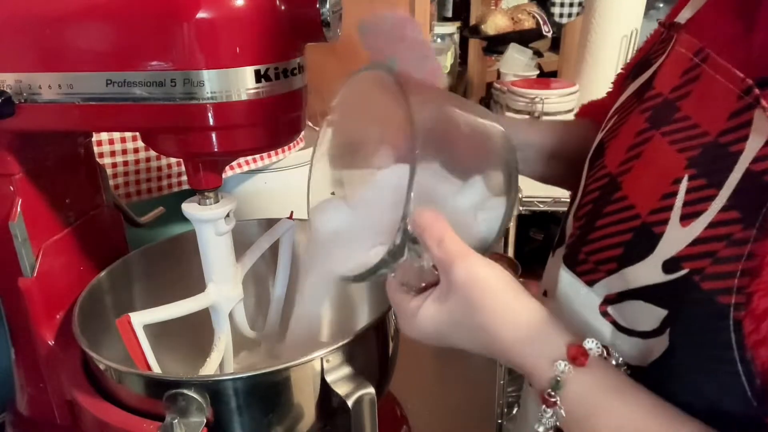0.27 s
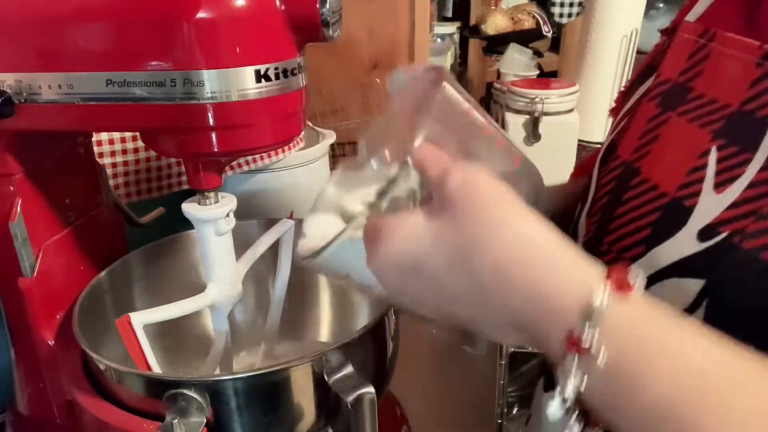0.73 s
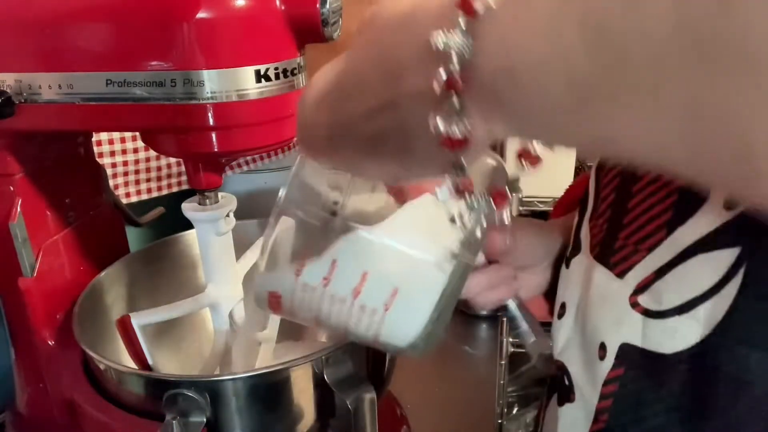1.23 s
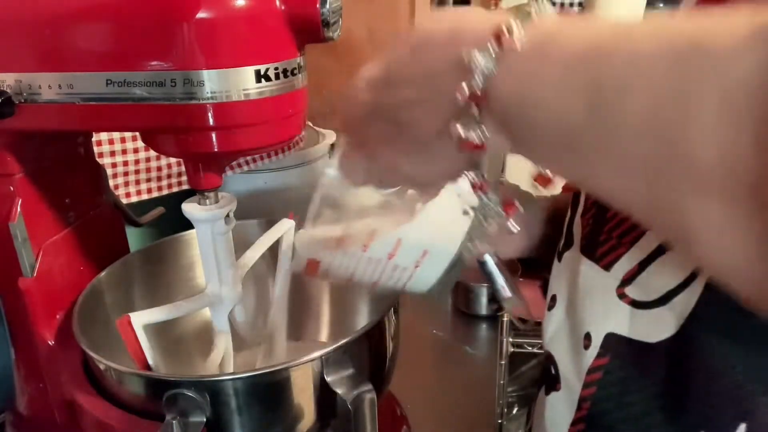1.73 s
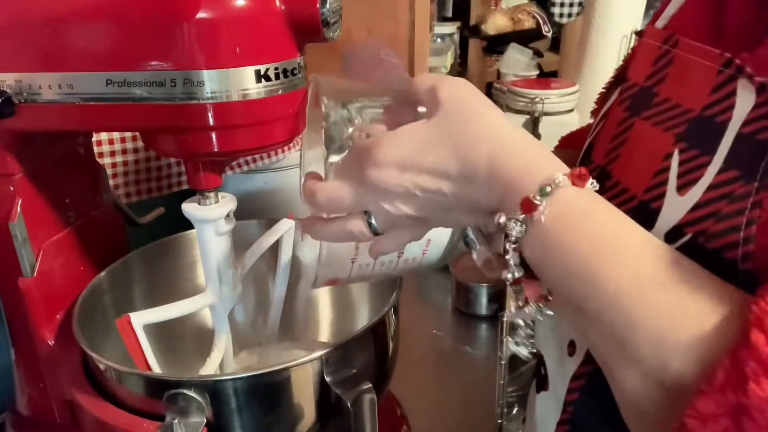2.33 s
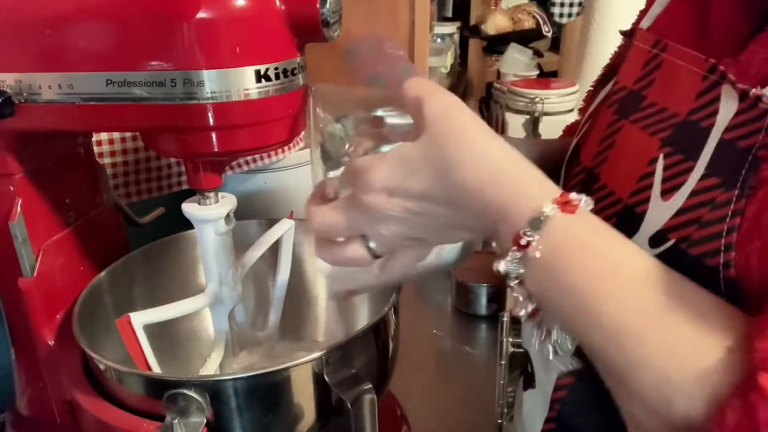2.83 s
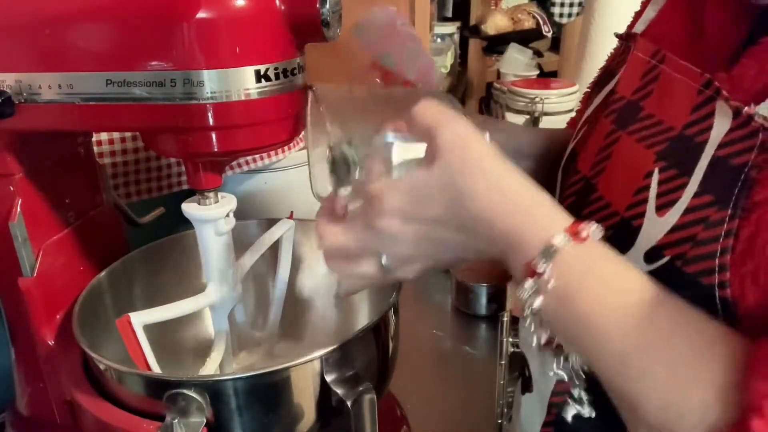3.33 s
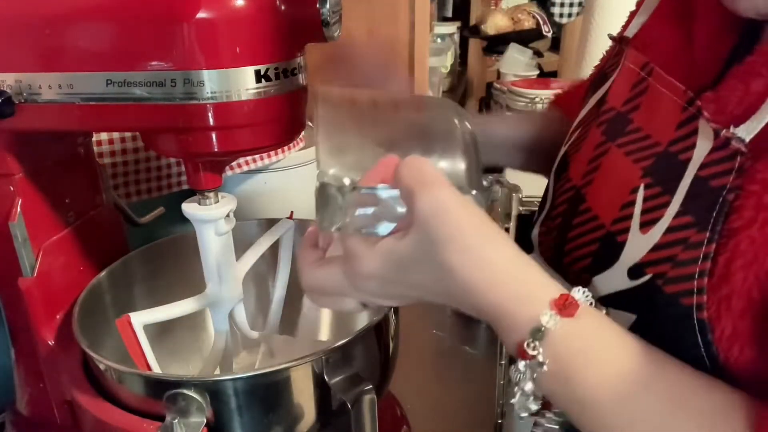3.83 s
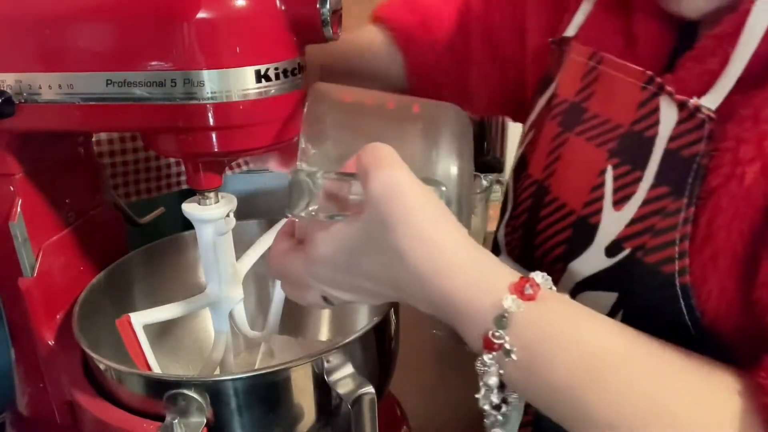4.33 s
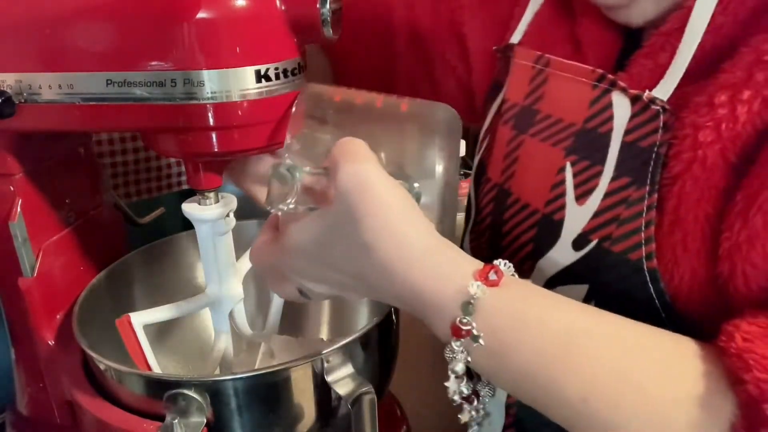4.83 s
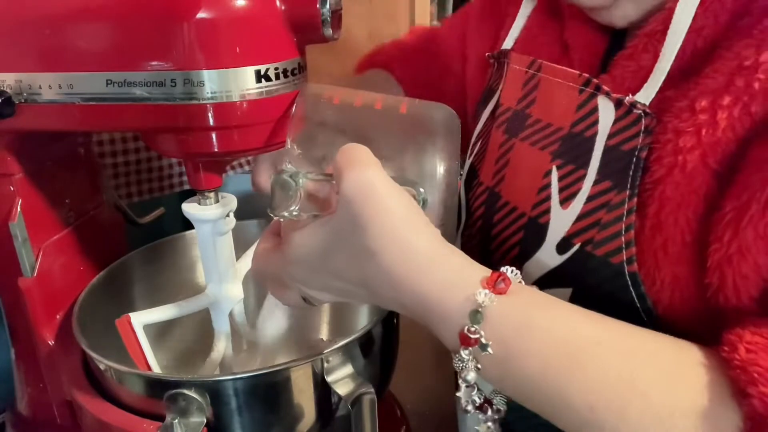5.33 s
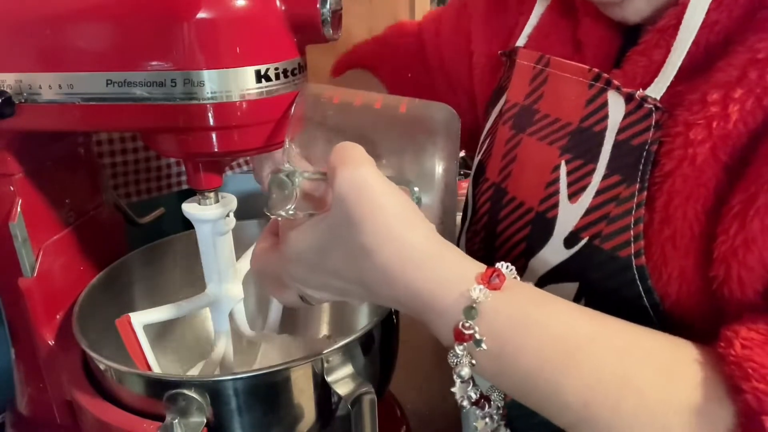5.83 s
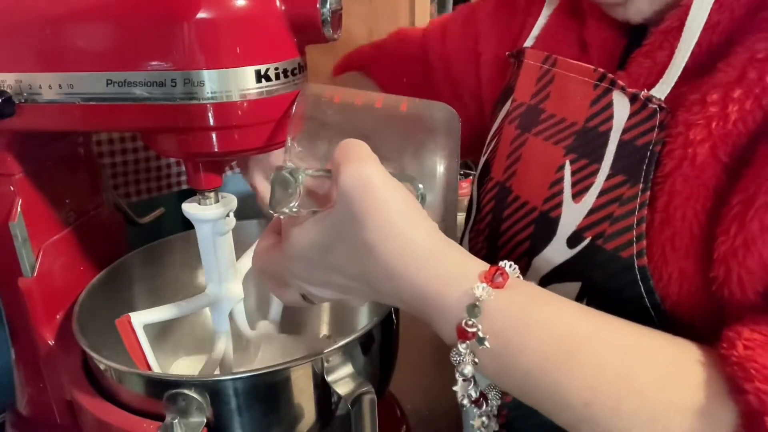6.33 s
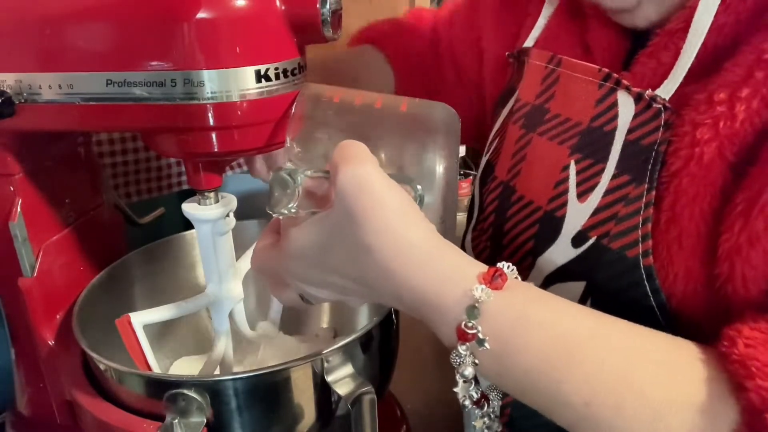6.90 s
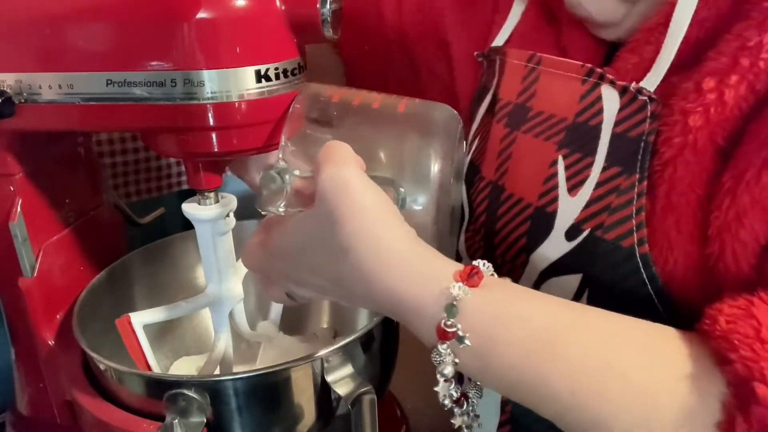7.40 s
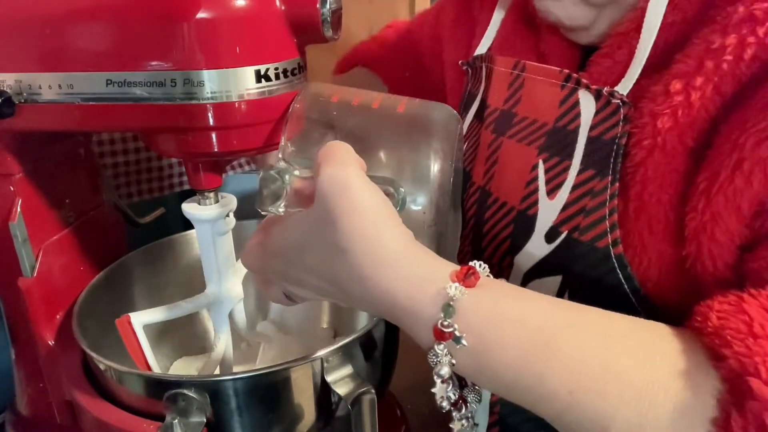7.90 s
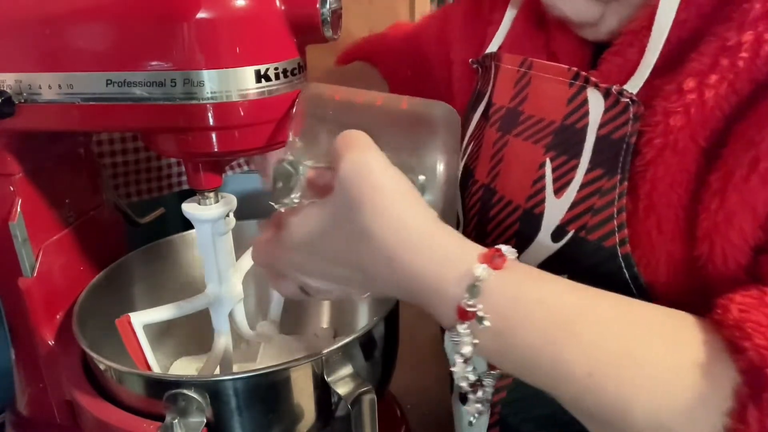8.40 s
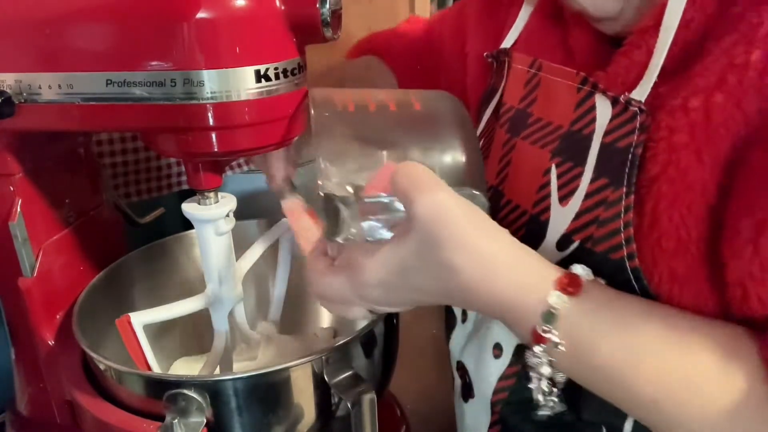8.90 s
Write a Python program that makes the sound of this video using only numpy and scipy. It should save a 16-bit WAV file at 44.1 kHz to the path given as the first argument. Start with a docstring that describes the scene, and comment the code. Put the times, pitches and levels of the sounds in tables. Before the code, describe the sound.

Glass measuring cup knocks, clinks and scrapes on a steel mixing bowl while sugar hisses out in a stream and later bursts, in a quiet kitchen.

```python
"""In a quiet kitchen, sugar is poured from a glass measuring cup into the steel bowl of a stand mixer.
Showers of random grain clicks, coloured by glass, sugar and steel, make the hissing spills and the stream.
The cup knocks, rubs and scrapes on the rim: bursts of tiny impacts set the ringing peaks of bowl and glass going.
Bracelet charms and crumbs tick, and the mixer bumps dully on the counter in narrow bands of low noise.
Echoes follow the contacts, over a low room murmur; two microphone ports hear it all in stereo."""
import sys
import numpy as np
from scipy import signal
from scipy.fft import rfft, irfft, next_fast_len
from scipy.io import wavfile
from scipy.ndimage import uniform_filter1d, map_coordinates

SR = 44100
rng = np.random.default_rng(int(sys.argv[2]) if len(sys.argv) > 2 else 0)


def pcm_store(signal):
    """Save signal as 16-bit PCM."""
    levels = np.round(np.clip(np.atleast_2d(signal), -1, 1) * 32767)
    wavfile.write(sys.argv[1], SR, levels.astype(np.int16).T)


N = 403515   # length of the scene [samples]
RING_SIZE = 16384   # length of one contact sound [samples]
RUB_SPOT_DB = 6   # how strongly each rub or scrape favours resonances of its own [dB]

# main stream falling freely on to the steel: (time [s], flow level [dB])
STREAM = [(1.43, -76), (1.49, -54), (1.56, -55.5), (1.72, -55.5), (1.86, -60.5), (2.0, -65), (2.21, -74.5),
          (2.33, -90)]
# tone of its fine spray: (frequency [Hz], relative level [dB])
SPRAY = [(2000, -22), (5500, -11), (8000, 4.5), (9800, 5.5), (12500, 2.5), (16000, 1.5)]
# tone of the heavier patter: (frequency [Hz], relative level [dB])
PATTER = [(500, -14.5), (1500, 4.5), (3000, -1.5), (5000, 3), (7500, -10), (11000, -15)]


def stream(crystals_per_s=16000, patter_db=-59, patter_follows=1.57, size=65536):
    """A dense stream of crystals sprays on the steel; as it thins, the patter dies before the fine hiss."""
    out, start = np.zeros((2, N)), STREAM[0][0]
    flow, = rest_outside(STREAM, start + seconds_of(size))
    crystals = np.array([grains(size, per_s=crystals_per_s, spread_db=4.5) for _ in range(4)])
    spray = flow * diffuse(crystals[:2], body(SPRAY, [], size), (8000, 15000))
    # patter_db holds at full flow; patter_follows is how much faster than the spray it dies
    patter_gain = from_db(patter_db) * (flow / flow.max()) ** patter_follows
    patter = patter_gain * diffuse(crystals[2:], body(PATTER, [], size), (2700, 7000))
    add_pair(out, start, spray + patter)
    return out


# spills of sliding sugar: (start [s], swell [s], hold [s], fade [s], relative hiss level [dB],
# relative level of the rush inside the cup [dB], glide of the rush [octaves/s])
SPILLS = [(0.351, 0.038, 0.75, 0.2, -82, -74, 0), (1.157, 0.09, 0.056, 0.25, -61.5, -69.5, 0.12),
          (2.91, 0.028, 0.69, 0.14, -67.5, -64.5, -0.098), (4.024, 0.04, 0.023, 0.36, -66, -70, 0.023),
          (4.583, 0.043, 0.013, 0.074, -72.5, -67, -.8), (4.92, 0.38, 0.083, 0.26, -58, -64, -0.1),
          (5.428, .04, 0.047, 0.17, -50.5, -60, -0.12), (5.702, 0.35, 0.038, 0.15, -51.5, -59, 0.14),
          (6.186, 0.055, 0.025, 0.058, -64.5, -74, -0.024), (6.31, 0.15, 0.098, 0.21, -56.5, -60.5, 0.16),
          (7.257, 0.038, 0.018, 0.072, -71.5, -74.5, 0), (7.458, 0.16, 0.16, 0.14, -62.5, -69, 0.23),
          (7.92, .025, 0.011, 0.043, -71.5, -86.5, -0.065), (8.161, 0.11, 0.11, 0.091, -60, -64.5, 0.51)]
# tone of grains on glass: (frequency [Hz], relative level [dB])
HISS = [(1000, -34), (3500, -18), (5500, -18.5), (7500, 2), (9500, -3.5), (12000, 2.5), (14500, -7),
        (16000, -19)]
# resonances of the sliding sugar: (frequency [Hz], width [Hz], lift [dB])
SUGAR_MODES = [(6013, 160, 3.7), (7000, 100, 7), (8070, 120, 6), (8550, 120, 5), (9380, 110, 14),
               (9720, 60, 4), (10130, 100, 6.3), (12300, 150, 3), (12900, 200, 4)]
# tone of the rush in the hollow cup: (frequency [Hz], relative level [dB])
RUSH = [(200, -14.5), (700, -0.5), (1200, 3), (2200, 4), (4200, 1.5), (6000, -1), (10000, -20.5)]
# resonances of the hollow cup: (frequency [Hz], width [Hz], lift or dip [dB])
CUP_MODES = [(790, 60, 9.5), (1250, 250, -2.5), (1630, 110, 1.5), (2110, 54, 11), (2581, 160, 4),
             (3470, 126, 1.5), (3930, 73, 8), (4300, 300, -3.5), (4650, 150, 1.5), (5700, 300, -8)]


def sugar(edge_s=0.038, hiss_db=-4.5, rush_db=0.5, coarse_db=-6, coarse_per_s=90, hollow_db=6.5,
          hollow_spacing_hz=130, clump_db=1.5, clumps_per_s=45, surge_db=3.0, surges_per_s=16,
          swell_power=1.05, fade_drop_db=23, fade_power=0.78, rush_follows=0.86, size=65536):
    """Crystals hiss over the glass; the hollow cup rings with them, and its pitch glides as the cup tilts."""
    out, t = np.zeros((2, N)), seconds_of(size)
    glass, cup = body(HISS, SUGAR_MODES, size), body(RUSH, CUP_MODES, size)
    for s, swell, hold, fade, hiss, rush, glide in SPILLS:
        end = swell + hold + fade
        # the spill trickles out, losing level a little faster at first, then is cut by a short edge
        fade_db = -fade_drop_db * np.clip((t - swell - hold) / fade, 0, 1) ** fade_power
        rise = np.sin(np.pi / 2 * np.minimum(t / swell, 1)) ** swell_power
        edge = np.clip(1 - (t - end) / edge_s, 0, 1)
        flow = uneven(t, clump_db, clumps_per_s) * rise * edge   # sugar falls in clumps
        crystals = np.array([grains(size, per_s=5400, spread_db=1.5) for _ in range(2)])
        # a few crystals are coarse
        crystals = crystals + from_db(coarse_db) * grains(size, per_s=coarse_per_s, spread_db=3.0)
        hissing = shifting(crystals, glass, (3500, 10000), hollow_db, hollow_spacing_hz)
        hissing = from_db(hiss_db + hiss + fade_db) * hissing
        hollow = shifting(crystals[::-1], cup, (2500, 5500), hollow_db, hollow_spacing_hz)
        hollow = gliding(hollow, glide * (np.minimum(t, end) - swell))
        # the rush takes only part of the hiss's fade, so it dies more slowly
        rushing = from_db(rush_db + rush + rush_follows * fade_db) * hollow
        add_pair(out, s, flow * (hissing + rushing * uneven(t, surge_db, surges_per_s)))
    return out


# lumps of sugar that break loose and land: (time [s], length [s], level [dB])
LUMPS = [(5.445, 0.11, -51.5), (5.737, 0.036, -56), (6.061, 0.11, -51), (6.548, 0.021, -62.5),
         (6.623, 0.036, -53.5), (6.666, 0.019, -59.5)]
# tone of their soft patter on the heap: (frequency [Hz], relative level [dB])
LUMP_TONE = [(100, 11), (450, 4), (900, 8.5), (1500, 3), (2500, -14.5), (4500, -7), (6000, 1.5),
             (10000, -20.5), (15000, -21)]


def lumps():
    """A lump falls apart as it lands: a short, dense shower of crystals."""
    out, t, heap = np.zeros(N), seconds_of(RING_SIZE), body(LUMP_TONE, CUP_MODES, RING_SIZE)
    for s, length, db in LUMPS:
        shower = np.sqrt(arch(t, length)) * grains(RING_SIZE, per_s=4200, spread_db=3)
        add(out, s, voiced(rfft(shower) * heap, [(300, 11000)], [db], seconds=length))
    return out


# broad tone of cup and bowl together: (frequency [Hz], relative level [dB])
BOWL = [(30, -43.5), (80, -16), (170, -7.5), (350, -10), (600, -5.5), (950, 7.5), (1400, -7.5),
        (2200, -19.5), (2900, -27), (4200, -29.5), (5600, -24.5), (8000, -31), (10000, -31), (15000, -43.5)]
# resonances of cup and bowl: (frequency [Hz], width [Hz], lift or dip [dB])
BOWL_MODES = [(102, 8, 9.5), (322, 4.6, 8), (425.9, 21, 10), (516.5, 29, 10.5), (574, 6.7, -17.5),
              (658, 18, 8.5), (742, 15, 10), (770, 40, 4.5), (900.5, 60.4, 10.5), (1044, 50, 15),
              (1130, 33, 6.5), (1230, 40, 6), (1283, 92, -9.5), (1356, 140, 6), (1470, 260, 8),
              (1830, 13, 7), (2114, 62, 14), (2470, 37, -7.5), (2385, 21, 11.5), (2504, 12, 15.5),
              (2584, 15, 6), (2800, 45, 6), (3000, 70, 2.5), (3610, 20, 8.5), (3770, 34, 7.5),
              (4760, 45, 12), (5090, 80, 15), (5120, 300, 4), (6310, 360, 12), (6560, 110, 4),
              (6800, 60, 1.5), (8560, 200, 7), (14150, 210, 7.5)]


def cup_and_bowl():
    """Cup and bowl answer every blow with a broad tone and many ringing peaks."""
    return body(BOWL, BOWL_MODES, RING_SIZE)


# two close rings of the glass that trade strength: (frequency [Hz], width [Hz], sign)
GLASS_PAIR = [(4370, 120, 0.83), (5100, 120, -1)]


def glass_wall(trade_db=4):
    """The point of contact, drawn at random, favours one of the two close rings of the glass."""
    favour_db = trade_db * rng.uniform(-1, 1)
    return body([(1000, 0)], [(hz, width, sign * favour_db) for hz, width, sign in GLASS_PAIR], RING_SIZE)


# cup strikes bowl: (time [s], relative strength [dB], hardness [dB], clank of the glass [dB])
KNOCKS = [(.012, -39.5, -13, -2), (0.052, -43, -16, 2), (0.182, -53, -23, 0), (0.242, -38, -22, -9),
          (0.326, -50, -20.5, -4), (0.414, -43.5, -18, -3), (1.0331, -23, -4.5, -12.5),
          (1.127, -42.5, -44, 13), (2.358, -35.5, -21.5, -2), (2.712, -34, -8, 2), (2.733, -32, -8, 0),
          (2.788, -30, -7, -2), (2.8065, -29, -4.5, 6), (2.908, -43.5, -33, 3), (3.016, -35, -9.5, -7),
          (3.0842, -22, -4, 6.5), (3.157, -26, -6.5, -1.5), (3.316, -18.5, -4, 8.5), (3.4492, -25, -4, -5),
          (3.4649, -17, -2, -2), (3.572, -30.5, -6.5, 3.5), (3.676, -43.5, -7.5, 5.5), (4.754, -40, -11, 0),
          (4.8314, -18, -7.5, 0), (4.866, -30, -7, -4), (4.9642, -23.5, -10, -13), (4.9871, -31, -10, -12),
          (5.003, -39.5, -12, -6), (5.9088, -30.5, -15, -21), (5.931, -34, -12.5, -22),
          (5.95, -38.5, -26, -10), (7.262, -44.5, -21, 2.5), (7.3965, -29, -10, 4.5),
          (7.4244, -34, -11, 7.5), (7.44, -40, -9.5, 5), (7.452, -45.5, -8, -14), (7.464, -40.5, -21, -21),
          (8.076, -53.5, -18, 27), (8.532, -33, -9, 5), (8.668, -37, -8.5, 2), (8.685, -36.5, -6.5, 2),
          (8.733, -23, -6.5, -8), (8.763, -23.5, -6, 4.5), (8.784, -26, -5.5, -19), (8.799, -32, -5, -21),
          (9.041, -49, -21.5, 11.5), (9.11, -55, -8, 1.5)]
# frequency bands of a knock: (low edge [Hz], high edge [Hz])
KNOCK_BANDS = [(60, 300), (300, 700), (700, 1400), (1400, 2700), (3500, 10000)]
# a harder blow reaches higher; per knock band: (level against the strength [dB], slope [dB per dB of hardness])
KNOCK_COLOUR = [(-19, -0.29), (-3, 0), (1, 0.49), (4, 1.68), (-1.5, 2.5)]
# a square hit rings the glass wall, a flat one the belly of the bowl:
# (frequency [Hz], width [Hz], signed share of the clank [ratio])
CLANK = [(2155, 190, 1.2), (1008, 75.7, 0.4), (813, 190, -0.53)]


def knocks(bowl, bite_s=0.002, buzz_t60=0.025, click_db=5, rattle_t60=0.21, rattle_db=-24, rattle_hz=2400,
           rattle_spot_db=6, spot_db=3.2, even_hz=280, level_db=-0.45):
    """Glass bites into the steel and clanks briefly, then the bowl rattles dully in its mount."""
    out, t = np.zeros(N), seconds_of(RING_SIZE)
    bite = 1 - np.exp(-t / bite_s)
    for s, db, hardness_db, clank_db in KNOCKS:
        click = from_db(click_db) * (t == 0)
        buzz = bite * dying(t, buzz_t60) * grains(RING_SIZE, per_s=6500, spread_db=4)
        rattle = bite * from_db(rattle_db) * dying(t, rattle_t60)
        rattle = rattle * grains(RING_SIZE, per_s=7500, spread_db=5.5)
        clank = body([(1000, 0)], [(hz, width, share * clank_db) for hz, width, share in CLANK], RING_SIZE)
        # each spot on the rim has a colour of its own
        blow = evened(click + buzz, even_hz) * clank * fine_modes(RING_SIZE, spot_db, spacing_hz=95.45)
        rattle_colour = dulled(rattle_hz) * fine_modes(RING_SIZE, rattle_spot_db, spacing_hz=55)
        blow = blow + rfft(rattle) * rattle_colour
        levels_db = band_levels(KNOCK_COLOUR, db, hardness_db)
        add(out, s, voiced(blow * bowl * glass_wall(), KNOCK_BANDS, levels_db, seconds=0.018))
    return from_db(level_db) * out


# cup drags on the rim: (time [s], length [s], relative strength [dB], grittiness [dB])
RUBS = [(.005, 0.043, -41.5, 1.5), (0.024, 0.057, -43, 2), (.08, 0.054, -35, -1.5),
        (0.154, 0.036, -37, -1.5), (0.223, 0.036, -42.5, 2), (0.29, 0.058, -43, 2), (0.375, 0.067, -46, 5),
        (1.29, 0.1, -53, 0.5), (1.443, 0.043, -42, 2.5), (1.492, 0.038, -46, 2.5), (1.584, 0.026, -48, 2.5),
        (1.621, 0.063, -49.5, 5), (1.688, 0.11, -53.5, 5.5), (1.772, 0.038, -50.5, 7.5),
        (1.807, 0.042, -47.5, 3.5), (1.919, 0.056, -53.5, -2), (2.013, 0.018, -46, -26),
        (2.138, 0.028, -41.5, -4), (2.207, .04, -55.5, 0.5), (2.306, 0.12, -49.5, 0),
        (2.353, 0.047, -42, 2), (2.466, 0.057, -48, -7), (2.537, 0.052, -50.5, -1), (2.609, 0.29, -61, 5.5),
        (2.708, 0.025, -29.5, 3.5), (2.946, 0.06, -49.5, -3), (3.002, 0.012, -38.5, -6.5),
        (3.597, 0.16, -47, -2), (3.671, 0.043, -36, 0.5), (3.892, 0.18, -51.5, -4),
        (4.708, 0.044, -46.5, 4.5), (8.454, 0.105, -37.5, -1), (8.545, .11, -46, -1.5),
        (8.699, .035, -48, 3.5), (8.67, 0.02, -40.5, 3.5), (8.762, 0.052, -29, -3),
        (8.807, 0.061, -37.5, -0.5), (8.941, 0.052, -42.5, 3)]
# frequency bands of a rub: (low edge [Hz], high edge [Hz])
RUB_BANDS = [(300, 700), (700, 1400), (1400, 2700), (4500, 7500)]
# sugar under the glass brightens the rub; per rub band:
# (level against the strength [dB], slope [dB per dB of grittiness])
RUB_COLOUR = [(-1.5, 0), (-5, 0.55), (-17.5, 1.55), (-15.5, 1.86)]
# force of rubbing against that of a blow: (frequency [Hz], relative level [dB])
RUB_TILT = [(100, -8.5), (300, -9), (480, 4), (750, -4), (1020, -3.5), (3500, -4), (7000, -1), (10000, -9),
            (15000, -0.5)]


def rubs(bowl, slips_per_s=3000, swell=0.54, slide_s=0.06, sing_hz=4980, sing_width_hz=260, sing_db=7.5,
         catch_db=3, catches_per_s=110, trail_db=-6.5, trail_t60=0.12, trail_hz=3000, level_db=-2):
    """Dragging glass catches and slips on sugar grains, making the cup sing; it trails off light and dull."""
    out, t = np.zeros(N), seconds_of(RING_SIZE)
    rubbed = bowl * body(RUB_TILT, [(sing_hz, sing_width_hz, sing_db)], RING_SIZE)
    slide = np.pi / 2 * t / slide_s   # after slide_s the cup is at a spot of another colour
    for s, length, db, grit_db in RUBS:
        pressure = arch(t, length) ** swell * uneven(t, catch_db, catches_per_s)
        force = 0
        for weight in (np.cos(slide), np.sin(slide)):
            slips = evened(weight * pressure * grains(RING_SIZE, per_s=slips_per_s, spread_db=1.5))
            force = force + slips * fine_modes(RING_SIZE, RUB_SPOT_DB, spacing_hz=88.4)
        # a light drag joins halfway through and dies away after the rub
        trail = (t > length / 2) * from_db(trail_db) * dying(np.maximum(t - length, 0), trail_t60)
        trail = trail * grains(RING_SIZE, per_s=slips_per_s, spread_db=0.0)
        force = force + rfft(trail) * dulled(trail_hz)
        levels_db = band_levels(RUB_COLOUR, db, grit_db)
        add(out, s, voiced(force * rubbed * glass_wall(), RUB_BANDS, levels_db, seconds=length))
    return from_db(level_db) * out


# cup slides back along the rim: (time [s], level of the bowl's rasp [dB], level of the glass singing [dB])
SCRAPE = [(.42, -75, -76), (0.451, -51.5, -65), (.52, -54.5, -60.5), (.59, -52, -54.5), (.72, -51.5, -48.5),
          (.775, -51, -52), (.80, -62, -63), (.87, -67, -73)]
# tone of the rasp: (frequency [Hz], relative level [dB])
RASP = [(150, -22), (450, -2.5), (900, 1), (1500, -3), (2200, -3.5), (3000, -21), (6000, -55)]
# tone of the singing glass: (frequency [Hz], relative level [dB])
SING = [(2500, -18), (4300, -18.5), (5500, -11.5), (7000, -6.5), (8200, -8), (9500, -16), (16000, -28)]
# resonances of the singing glass: (frequency [Hz], width [Hz], lift [dB])
SING_MODES = [(4800, 150, 17.5), (5030, 110, 24.5), (6700, 200, 14), (7300, 200, 5), (10900, 400, 10)]


def scrape(catch_db=-1.0, catches_per_s=70, size=32768):
    """Sugared glass slips along the rim: the bowl rasps and the glass sings, swelling before it dies away."""
    out, start, t = np.zeros((2, N)), SCRAPE[0][0], seconds_of(size)
    voices = [(body(RASP, [], size), (600, 2600)), (body(SING, SING_MODES, size), (4500, 8000))]
    grip = uneven(t, catch_db, catches_per_s)
    for gain, (response, band) in zip(rest_outside(SCRAPE, start + t), voices):
        slips = np.array([grains(size, per_s=4000, spread_db=2.0) for _ in range(2)])
        add_pair(out, start, gain * grip * shifting(slips, response, band, RUB_SPOT_DB, spacing_hz=99.3))
    return out


# bracelet charms touch: (time [s], relative level [dB])
CHARMS = [(.3603, -51), (1.144, -68), (1.182, -65), (2.934, -56.5), (3.051, -61), (3.136, -53), (3.77, -56),
          (3.875, -42.5), (4.066, -46.5), (4.178, -58), (4.572, -57), (5.532, -47), (5.59, -46.5),
          (6.243, -60), (6.396, -52.5), (6.852, -49), (6.911, -63.5)]
# crumbs of sugar hit glass and steel: (time [s], relative level [dB])
CRUMBS = [(.5366, -65), (1.334, -59), (1.385, -66), (1.417, -54), (1.437, -67), (1.487, -57.5),
          (1.5285, -54), (2.361, -60.5), (2.912, -65), (3.416, -58.5), (5.384, -53), (5.398, -78),
          (5.453, -58), (5.733, -56), (6.083, -55), (6.626, -52.5), (6.669, -62.5), (6.711, -67),
          (7.103, -62.5), (8.47, -65), (6.19, -67), (6.605, -69)]
# frequency bands of a tick: (low edge [Hz], high edge [Hz])
TICK_BANDS = [(2500, 5500), (6000, 9000), (9000, 15500)]
# a charm rings mostly in the middle band: (low [dB], middle [dB], high [dB])
CHARM_COLOUR_DB = (-23, 0.5, -14.5)
# a crumb clicks almost evenly in all three: (low [dB], middle [dB], high [dB])
CRUMB_COLOUR_DB = (-1.5, -1, 0.5)
# broad tone of the ticks: (frequency [Hz], relative level [dB])
CHARM = [(300, -30), (1500, -13.5), (3000, -11), (5500, 7.5), (7200, -1.5), (10000, -4.5), (16000, -9.5)]
# resonances of the ticks: (frequency [Hz], width [Hz], lift [dB])
CHARM_MODES = [(4322, 89, 0), (6700, 140, 10), (7150, 27, 12), (7640, 43, 3.5), (10400, 150, 0.5),
               (13100, 200, 1)]


def ticks(rise_s=0.00086, jitter_t60=0.041, jitter_db=-11, own_modes_db=4, level_db=-4.0):
    """Charms and crumbs touch and settle: a click and a brief jitter, each with a ring of its own."""
    out, t, charm = np.zeros(N), seconds_of(RING_SIZE), body(CHARM, CHARM_MODES, RING_SIZE)
    settling = (1 - np.exp(-t / rise_s)) * from_db(jitter_db) * dying(t, jitter_t60)
    for touches, colour_db in [(CHARMS, CHARM_COLOUR_DB), (CRUMBS, CRUMB_COLOUR_DB)]:
        for s, db in touches:
            force = (t == 0) + settling * grains(RING_SIZE, per_s=2100, spread_db=1.0)
            own = fine_modes(RING_SIZE, own_modes_db, spacing_hz=201.4)
            add(out, s, voiced(rfft(force) * charm * own, TICK_BANDS, np.add(db, colour_db), seconds=0.046))
    return from_db(level_db) * out


# dull bumps through the counter: (time [s], level [dB], pitch [Hz])
BUMPS = [(0.409, -44, 117), (1.046, -35, 130), (1.122, -41, 121), (2.364, -34.5, 102), (3.487, -36, 77),
         (3.679, -47, 86), (4.868, -43.5, 76.2), (6.235, -37.5, 87.5), (8.088, -41.5, 110),
         (8.151, -39.5, 75), (9.077, -40, 119), (9.112, -37.5, 91.2)]


def bumps(rise_s=0.0046, width_hz=32, bump_t60=0.22, shake_db=-22.5, shake_hz=85, shake_t60=0.45):
    """Soft pushes, and every knock, set the heavy mixer and the counter shaking in a narrow low band."""
    out, t, hz = np.zeros(N), seconds_of(RING_SIZE), bins(RING_SIZE)
    pushes = [(s, db, pitch, bump_t60) for s, db, pitch in BUMPS]
    # shake_db is set against the strength of the knock
    pushes += [(s, db + shake_db, shake_hz, shake_t60) for s, db, *_ in KNOCKS]
    for s, db, pitch, t60 in pushes:
        narrow = rfft(rng.standard_normal(RING_SIZE)) * np.exp(-((hz - pitch) / width_hz) ** 2)
        steady = np.cos(np.angle(signal.hilbert(irfft(narrow))))   # keep the wobbling pitch, level the swings
        add(out, s, steady * (1 - np.exp(-t / rise_s)) * from_db(db) * dying(t, t60))
    return signal.sosfilt(signal.butter(2, 55, "high", fs=SR, output="sos"), out)


def near_echoes(x, echo_db=-13, echo_t60=0.036):
    """Quick reflections off the mixer head and the counter reach each port differently."""
    t = seconds_of(RING_SIZE)
    echoes = rng.standard_normal((2, RING_SIZE)) * dying(t, echo_t60) * (t > .001)
    echoes = echoes / np.sqrt(np.sum(echoes[0] ** 2))
    echoes = signal.sosfilt(signal.butter(1, 300, "high", fs=SR, output="sos"), echoes)
    return from_db(echo_db) * signal.fftconvolve(echoes, x[None], axes=1)[:, :N]


def kitchen(x, bass_t60=0.31, middle_t60=0.23, clank_t60=0.23, treble_t60=0.15, clank_db=-4, treble_db=3.0,
            delay_s=0.0062, wet_db=-16.5):
    """Scattered reflections, different at each port, die away fastest in the treble."""
    t, hz, tail = seconds_of(RING_SIZE), bins(RING_SIZE), 0
    white = rfft(rng.standard_normal((2, RING_SIZE)))
    registers = [(0, 1000, bass_t60, 0.0015), (335, 1600, middle_t60, 0),
                 (1410, 4500, clank_t60, clank_db), (2680, 10000, treble_t60, treble_db)]
    for low, high, t60, db in registers:
        fade = dying(t, t60) * (t > delay_s)
        fade = fade / np.sqrt(np.sum(fade ** 2))
        tail = tail + from_db(db) * irfft(white * ((hz >= low) & (hz < high))) * fade
    return from_db(wet_db) * signal.fftconvolve(tail, x[None], axes=1)[:, :N]


# tone of the quiet room: (frequency [Hz], relative level [dB])
ROOM_TONE = [(15, -61), (30, -28), (60, -17.5), (186, -13), (250, -19), (286, -12), (373, -18.5),
             (438, -13.5), (749, -26), (1500, -44.5), (1670, -39), (2240, -49), (2700, -43.5),
             (6040, -48.5), (6900, -44.5), (15000, -50.5)]


def room_tone(level_db=-60.5):
    """The low, steady murmur of the kitchen's air and appliances, made of filtered noise."""
    size = 2 * next_fast_len(N // 2 + 1)
    murmur = diffuse(rng.standard_normal((2, size)), body(ROOM_TONE, [], size), (0, SR))
    return from_db(level_db) * murmur[:, :N]


def from_db(db):
    """Decibels to gain."""
    return 10 ** (np.asarray(db) / 20)


def seconds_of(size):
    """Time of each of that many samples, in seconds."""
    return np.arange(size) / SR


def dying(t, t60):
    """A gain that falls by 60 dB in t60 seconds."""
    return from_db(-60 * t / t60)


def arch(t, length):
    """A half sine that rises and falls once within the length, then stays at rest."""
    return np.maximum(np.sin(np.pi * np.minimum(t / length, 1)), 0)


def at_hz(points, hz):
    """Read a table at given frequencies, on a logarithmic axis."""
    points = np.array(points)
    return np.interp(np.log(hz + 0.0017), np.log(points[:, 0]), points[:, 1])


def bins(size):
    """Frequencies in the spectrum of that many samples."""
    return np.arange(size // 2 + 1) * SR / size


def causal(db):
    """Minimum-phase response with the given levels: nothing sounds early."""
    cepstrum = irfft(np.log(from_db(db)))
    half = len(cepstrum) // 2
    return np.exp(rfft(np.r_[cepstrum[0], 2 * cepstrum[1:half], np.zeros(half)]))


def body(spectrum, modes, size):
    """Response of an object: a broad tone with ringing peaks, or dips where the lift is negative."""
    hz = bins(size)
    response = causal(at_hz(spectrum, hz))
    for centre, width, lift_db in modes:
        damping = 1j * hz * width
        resonance = damping / (centre ** 2 - hz ** 2 + damping)
        response = response * (1 + (from_db(lift_db) - 1) * resonance)
    return response


def fine_modes(size, depth_db, spacing_hz):
    """A crowd of weak resonances too many to name: random peaks and dips along frequency."""
    heights = np.clip(rng.standard_normal(4000), -2, 2)
    return causal(depth_db * np.interp(bins(size) / spacing_hz, np.arange(len(heights)), heights))


def dulled(hz):
    """Response of a soft contact: it weakens sounds more and more above that frequency."""
    return 1 / (1 + 1j * bins(RING_SIZE) / hz) ** 2


def evened(force, width_hz=120):
    """Spectrum of a contact force that favours no pitch, so that the struck body gives the colour."""
    spectrum = rfft(force)
    power = uniform_filter1d(abs(spectrum) ** 2, max(round(width_hz * RING_SIZE / SR), 1))
    return spectrum * causal(-10 * np.log10(np.maximum(power / power.mean(), 1e-2)))


def band_power(spectrum, low, high):
    """Energy (sum of squared samples) of a spectrum between two frequencies, averaged over channels."""
    size = 2 * (spectrum.shape[-1] - 1)
    hz = bins(size)
    inside = spectrum[..., (hz >= low) & (hz < high)]
    return 2 * np.mean(np.sum(abs(inside) ** 2, axis=-1)) / size + 1e-20


def band_levels(rule, strength_db, hardness_db):
    """Level of each band for a contact of that strength and hardness."""
    return [strength_db + offset_db + slope * hardness_db for offset_db, slope in rule]


def voiced(spectrum, bands, levels_db, seconds):
    """Place and hardness of a contact set how strongly each band answers."""
    for _ in range(2):   # neighbouring bands affect each other, so adjust twice
        gains = []
        for (low, high), db in zip(bands, levels_db):
            present_db = 10 * np.log10(band_power(spectrum, low, high) / (seconds * SR))
            gains.append((np.sqrt(low * high), db - present_db))
        spectrum = spectrum * causal(at_hz(gains, bins(RING_SIZE)))
    return irfft(spectrum)


def grains(size, per_s, spread_db):
    """Tiny impacts at random moments, of uneven size; rms 1."""
    hits = rng.random(size) < per_s / SR
    clicks = hits * rng.standard_normal(size) * from_db(spread_db * rng.standard_normal(size))
    return clicks / (clicks.std() + 1e-12)


def uneven(t, depth_db, per_s):
    """A gain that surges and sags at random, so many times a second."""
    heights = np.clip(rng.standard_normal(1000), -2, 2)
    return from_db(depth_db * np.interp(t * per_s, np.arange(1000), heights))


def rest_outside(rows, t):
    """Gains along the columns of a level curve, silent before and after it."""
    s, *columns = np.transpose(rows)
    return [from_db(np.interp(t, s, db, left=-200, right=-200)) for db in columns]


def shifting(source, response, band, depth_db, spacing_hz, swing_s=0.25):
    """Colour a sound with resonances that swing to another set and back in swing_s seconds."""
    size = source.shape[1]
    swing = np.pi * seconds_of(size) / swing_s + rng.uniform(0, np.pi)
    out = 0
    # one colour dissolves into the other, each fed by other crystals
    for k, weight in enumerate([np.cos(swing), np.sin(swing)]):
        coloured = response * fine_modes(size, depth_db, spacing_hz)
        out = out + weight * diffuse(np.roll(source, k * size // 2, axis=1), coloured, band)
    return out


def gliding(pair, octaves):
    """All resonances of a sound move together along a pitch curve."""
    place = np.cumsum(2 ** octaves)
    return np.array([map_coordinates(x, [place], order=3, mode="mirror") for x in pair])


# likeness of diffuse sound at the two ports: (frequency [Hz], likeness [0 to 1])
LIKENESS = [(100, 1), (600, 0.19), (2000, 0.21), (5000, 0.13), (9000, 0.99)]


def diffuse(pair, response, band):
    """Two unrelated noises become a coloured, partly alike stereo pair with rms 1 in a band."""
    size = pair.shape[1]
    mid, side = rfft(pair) * response
    alike = np.clip(at_hz(LIKENESS, bins(size)), 0, 1)
    both = np.sqrt(1 + alike) * mid + np.sqrt(1 - alike) * side * [[1], [-1]]
    return irfft(both / np.sqrt(band_power(both, *band) / size))


def add(track, s, sound):
    """Mix a sound into a track at a time in seconds."""
    start = max(round(s * SR), 0)
    track[start:start + len(sound)] += sound[:N - start]


def add_pair(tracks, s, pair):
    """Mix a stereo sound into two tracks at a time in seconds."""
    for track, sound in zip(tracks, pair):
        add(track, s, sound)


def scene():
    """Cup, bowl and bracelet close by, with the sugar and the room around them."""
    bowl = cup_and_bowl()
    contacts = knocks(bowl) + rubs(bowl) + ticks() + lumps() + bumps()
    pouring = stream() + sugar()
    return pouring + contacts + scrape() + near_echoes(contacts) + kitchen(contacts) + room_tone()


# how far the left port leads the right: (frequency [Hz], phase [rad])
PORT_PHASE = [(100, 0), (520, -.2), (950, .6), (1290, .2), (1720, .4), (2150, -.3), (2410, -1.9),
              (2700, -2.2), (3500, -1.2), (4400, 0), (5100, 2.9), (6500, 3.7), (8400, 6.2), (9500, 6.4),
              (11000, 9.3), (12200, 9.7), (13200, 12.4), (14800, 12.8), (16000, 15.7)]
# how much louder the left port is than the right: (frequency [Hz], difference [dB])
PORT_BALANCE = [(120, .7), (350, -2.3), (1100, -2.3), (2100, -5), (4500, -2.7), (8000, 0)]


def record(dry, overload=0.88, cutoff_hz=15900):
    """The two ports hear with different phase and strength; the highest peaks overload and the top is cut."""
    size = next_fast_len(N + RING_SIZE)
    hz, sides = bins(size), np.array([[1], [-1]])
    strength = from_db(sides * at_hz(PORT_BALANCE, hz) / 2)
    phase = np.exp(.5j * sides * at_hz(PORT_PHASE, hz))
    heard = irfft(rfft(dry, size) * strength * phase, size)[:, :N]
    heard = np.clip(heard, -overload, overload)
    return signal.sosfilt(signal.ellip(10, .1, 80, cutoff_hz, fs=SR, output="sos"), heard)


dry = scene()
out = record(dry)
pcm_store(out)
```